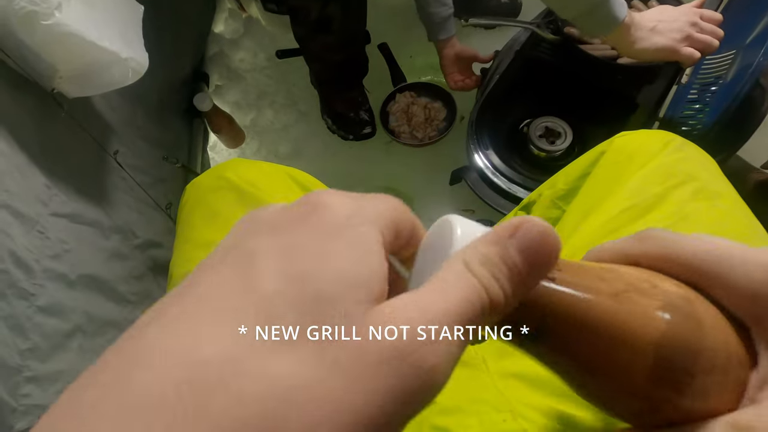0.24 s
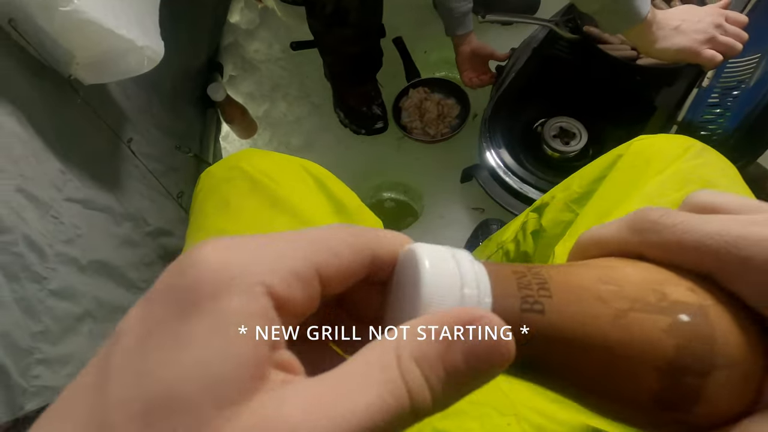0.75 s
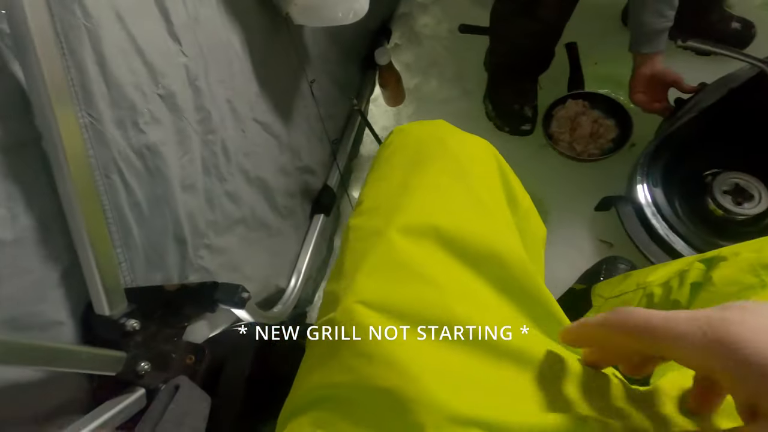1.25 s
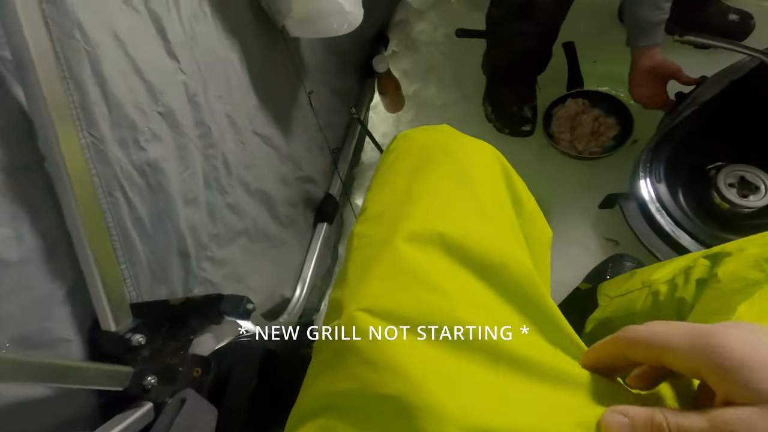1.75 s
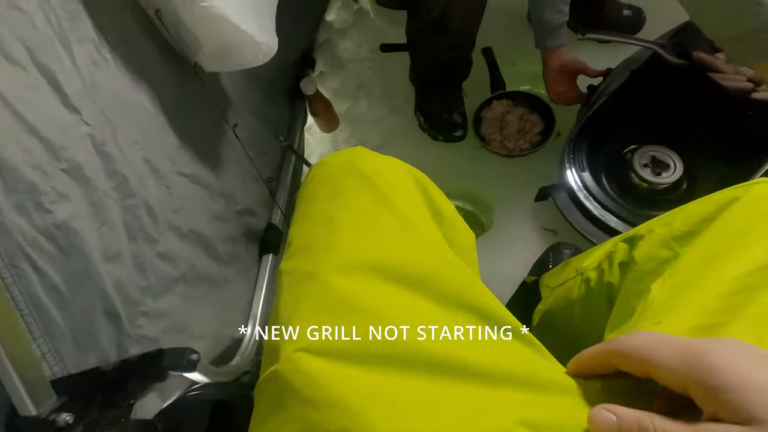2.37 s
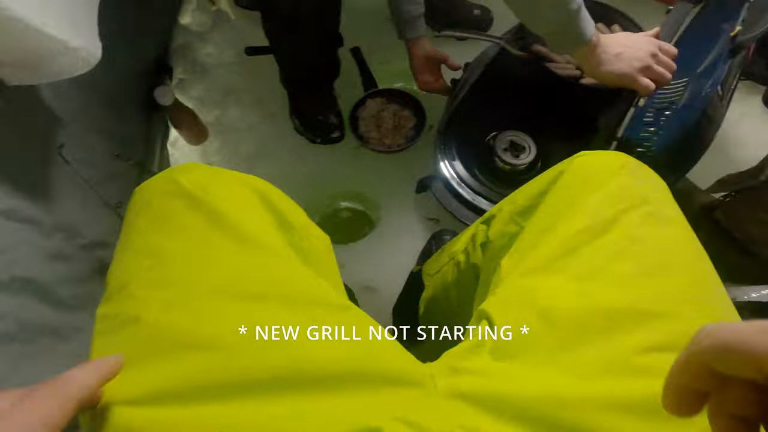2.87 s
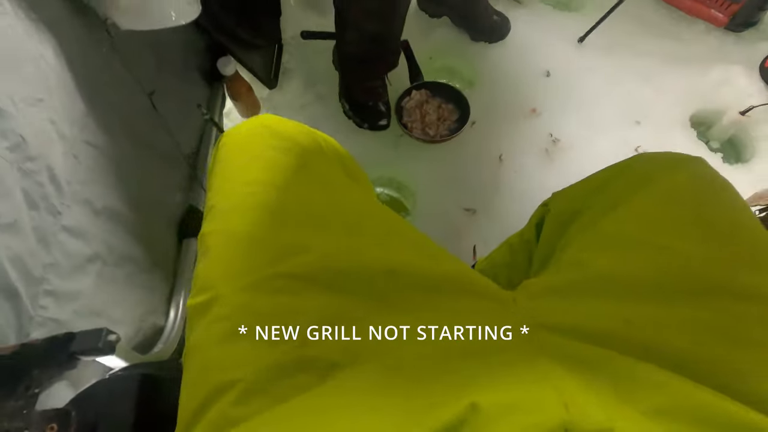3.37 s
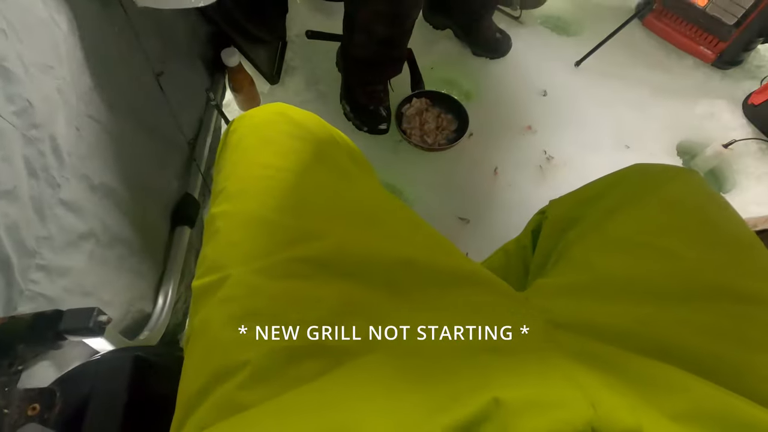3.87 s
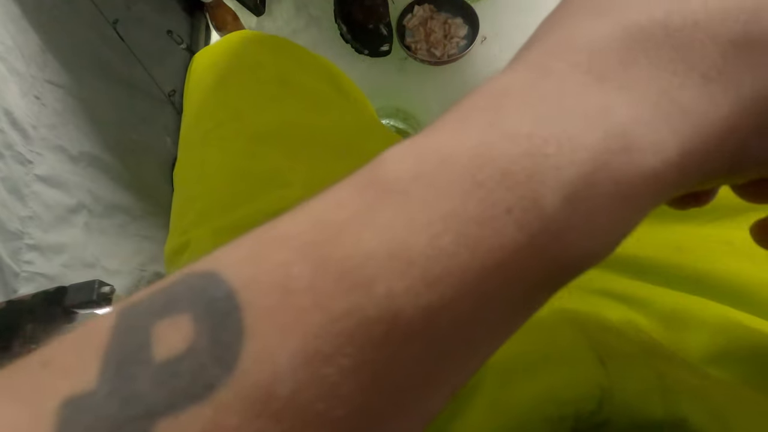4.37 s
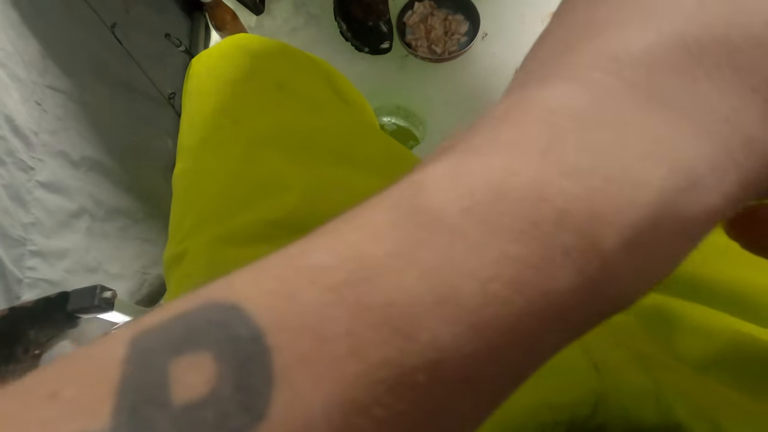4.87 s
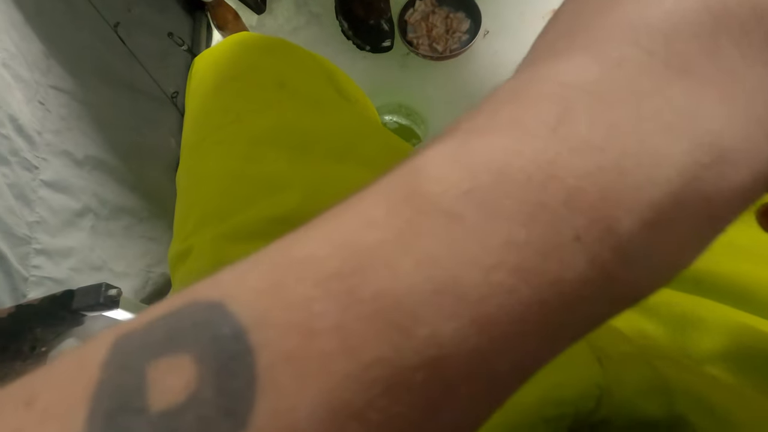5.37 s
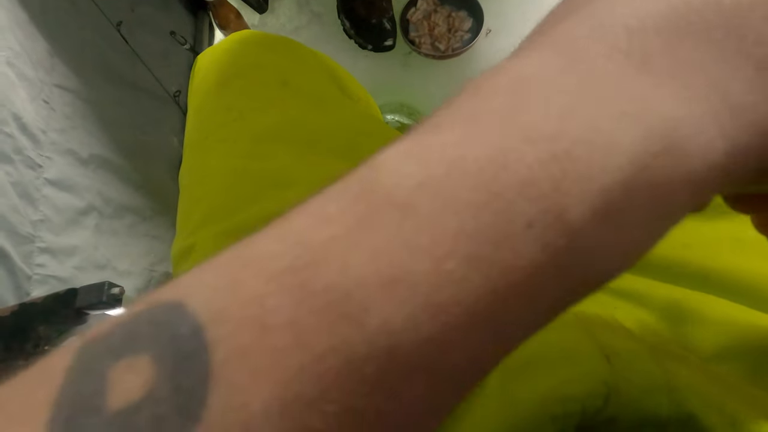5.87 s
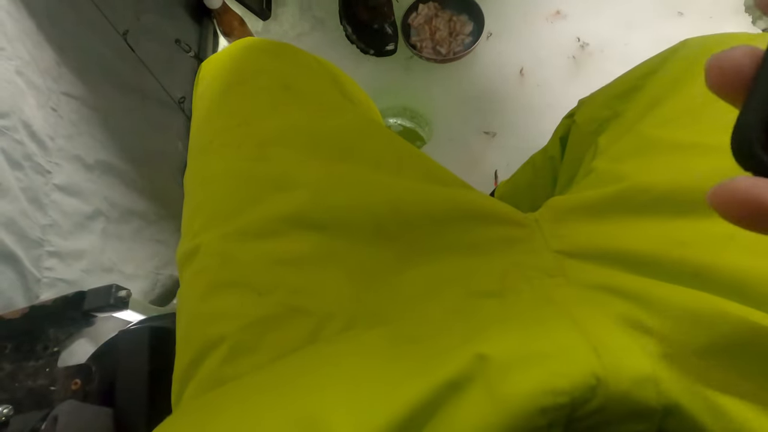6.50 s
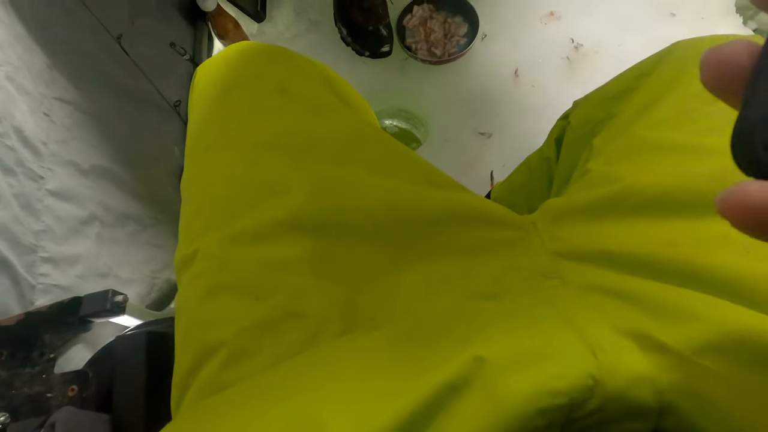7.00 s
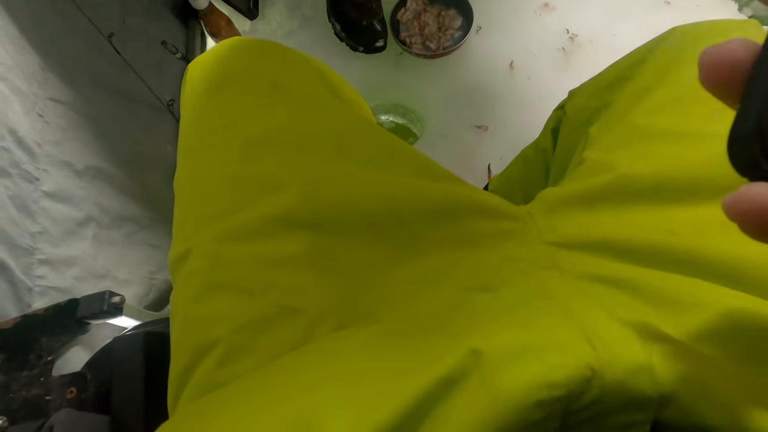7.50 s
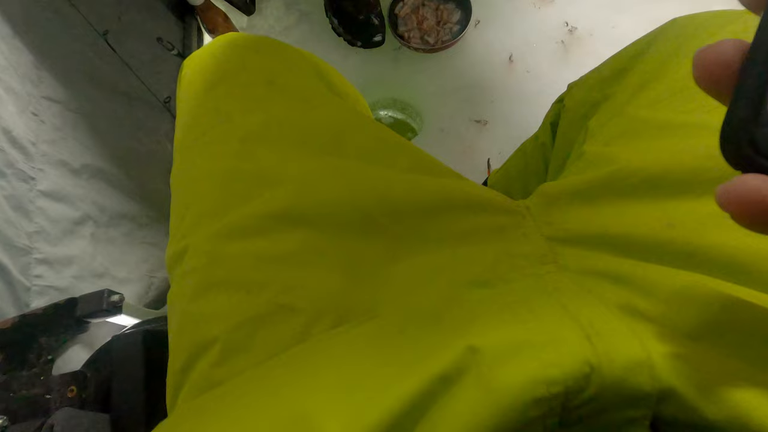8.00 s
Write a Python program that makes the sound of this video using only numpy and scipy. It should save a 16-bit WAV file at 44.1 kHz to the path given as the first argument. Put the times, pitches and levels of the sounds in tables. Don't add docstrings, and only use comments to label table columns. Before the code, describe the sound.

Repeated bright steel snaps from a piezo igniter dominate, close and dry with a short wash off fabric walls. Between them the button ticks back, cloth rustles and boots shuffle, busiest at first. The snapping stops midway while gear thumps and knocks, then returns and quickens, shifted left, with a thin gas whistle and tiny spring squeaks near the end. Worn stereo microphone, low rumble and soft heater hiss throughout.

```python
import sys
import numpy as np
from scipy import signal
from scipy.fft import rfft, irfft
from scipy.io import wavfile
from scipy.ndimage import uniform_filter1d

SR = 44100
rng = np.random.default_rng(int(sys.argv[2]) if len(sys.argv) > 2 else 0)


def amp(db):
    return 10 ** (np.asarray(db, float) / 20)


def write(x):
    x = np.atleast_2d(x).T
    wavfile.write(sys.argv[1], SR, np.round(np.clip(x, -1, 1) * 32767).astype(np.int16))


N = 363516
TIME_S = np.arange(N) / SR
TURN_S = 2.95


def on_log(table, hz):
    table = np.array(table)
    return np.interp(np.log(np.maximum(hz, 1)), np.log(table[:, 0]), table[:, 1])


# pitch_hz, likeness_0_to_1
LIKENESS = [(40, 1), (150, 0.86), (300, 0.96), (600, 0.96), (1000, 0.89), (3000, 0.96), (8000, 0.53)]


def unlike(hz, spread_hz=30000):
    like = np.clip(on_log(LIKENESS, hz), 0, .999) / (1 + (hz / spread_hz) ** 2)
    return np.sqrt((1 - like) / (1 + like)) * np.array([[1], [-1]])


def noise(size, shape):
    hz = np.fft.rfftfreq(size, 1 / SR)
    mid, side = rfft(rng.standard_normal((2, size)))
    x = irfft(shape(hz) * (mid + unlike(hz, spread_hz=4700) * side), size)
    return x / x.std()


def band(lo_hz, hi_hz):
    return lambda hz: 1 / np.sqrt((1 + (lo_hz / (hz + 1)) ** 4) * (1 + (hz / hi_hz) ** 6))


def peak(centre_hz, width_hz):
    return lambda hz: 1 / np.sqrt(1 + ((hz - centre_hz ** 2 / (hz + 1)) / width_hz) ** 2)


def walk(rate_hz):
    hold = int(SR / rate_hz)
    levels = np.repeat(rng.standard_normal(N // hold + 1), hold)
    return 1.22 * uniform_filter1d(levels, hold)[:N]


def decay(t, t60_s):
    return 1000 ** (-t / t60_s)


def add(out, x, start_s, peak_db, pan_db):
    i = max(int(start_s * SR), 0)
    x = x[:, :N - i]
    power = uniform_filter1d(x.mean(axis=0) ** 2, size=180)
    x = x / np.sqrt(2 * np.max(power))
    out[:, i:i + x.shape[1]] += x * amp(peak_db + np.array([[pan_db], [-pan_db]]) / 2)


# pitch_hz, level_db_per_hz
HISS = [(71, -43.5), (120, -25), (280, -13.5), (372, 1), (420, -39), (514, 2.5), (557, -26), (655, -23),
        (852, -24), (1330, -7), (2290, -35), (4840, -15.5), (5920, -31), (8020, -21.5), (15000, -62)]
# pitch_hz, width_hz, level_db
WHISTLES = [(370, 22, -70), (473, 6.7, -71.5), (512, 10, -72.5), (1337, 11, -72), (1550, 20, -78),
            (1710, 5.9, -69.5), (1930, 23, -75.5), (3050, 11, -74.5), (4256, 13, -70.5), (4970, 19, -80),
            (6600, 80, -88)]
# pitch_hz, width_hz, level_db, start_s, end_s
VALVE_WHISTLES = [
    (8000, 80, -79, 4.5, 6.6),
    (6560, 56, -68, 6.8, 11),
]


def heater():
    hiss = noise(N, lambda hz: amp(on_log(HISS, hz)) * (hz > 100) * band(60, 8800)(hz) ** 2)
    out = amp(-62 + 0.39 * walk(3.3)) * hiss
    for hz, width_hz, db in WHISTLES:
        out += amp(db + 1.35 * walk(1.88)) * noise(N, peak(hz, width_hz))
    for hz, width_hz, db, start_s, end_s in VALVE_WHISTLES:
        is_open = abs(TIME_S - (start_s + end_s) / 2) < (end_s - start_s) / 2
        valve = uniform_filter1d(1. * is_open, size=8000)
        out += amp(db) * valve * noise(N, lambda f: peak(hz, width_hz)(f) ** 2)
    return out


# start_s, rumble_db, shuffle_db, cloth_db, crisp_cloth_db
STIR = [(0.0, -58, -38, -67, -71), (0.11, -47, -45.5, -49, -69.5), (0.18, -47, -49.5, -45, -58),
        (0.39, -43.5, -52.5, -51, -70), (0.53, -51.5, -55, -53, -73), (0.71, -48.5, -58, -56.5, -79),
        (0.92, -55, -55, -59, -76), (1.1, -47, -48, -45.5, -60), (1.24, -47.5, -43, -41, -48),
        (1.4, -45.5, -43.5, -48.5, -61), (1.47, -60, -53, -42, -69), (1.51, -48, -48, -51, -75.5),
        (1.58, -53, -51, -50.5, -73), (1.65, -41.5, -59.5, -50, -67), (1.81, -56, -47, -47.5, -68),
        (1.97, -44.5, -44.5, -45, -57), (2.18, -48.5, -57, -46.5, -61), (2.32, -46.5, -46.5, -49.5, -72),
        (2.5, -50, -73, -50.5, -63), (2.54, -45, -59, -47, -64), (2.68, -52.5, -53, -43.5, -64),
        (2.84, -49, -49, -51.5, -90.5), (2.98, -49.5, -56, -52.5, -70), (3.05, -35, -62, -54, -67),
        (3.21, -44.5, -59, -53.5, -66), (3.44, -56, -52, -52, -82), (3.58, -46.5, -60.5, -56, -72),
        (3.83, -52, -39.5, -46.5, -84.5), (3.9, -43.5, -56, -59, -71), (3.99, -57.5, -48, -55, -84),
        (4.08, -47, -67, -56, -83), (4.18, -57, -50, -69, -79), (4.36, -50, -67, -59, -75),
        (4.59, -57, -57, -54, -66), (4.68, -50, -67, -56, -72), (4.84, -51, -58, -48, -83),
        (4.89, -39, -69, -47.5, -81), (5.0, -50.5, -59, -51, -63), (5.07, -42.5, -51, -47, -66),
        (5.21, -50.5, -64, -57, -70), (5.58, -46, -62, -55.5, -73), (5.85, -54, -58, -57.5, -73),
        (6.08, -50, -64, -51, -70), (6.27, -53.5, -56, -55.5, -73), (6.31, -44, -58, -56, -73),
        (6.47, -58.5, -55.5, -56, -79), (6.59, -43.5, -63, -49, -72), (6.65, -56, -58, -53, -64),
        (7.0, -43.5, -53.5, -50, -82.5), (7.04, -53, -56, -59, -88.5), (7.18, -49, -55, -51.5, -62),
        (7.85, -52.5, -65, -51, -79), (8.24, -50, -64, -53.5, -65)]
# pitch_hz, level_db
BOOM = [
    [(100, -27), (215, 4), (350, -4), (520, -1), (900, -6), (1500, -44)],
    [(100, -3), (215, -2), (375, 3.5), (520, -6), (650, -3.5), (1000, -43.5)],
]


def stir():
    start_s, *columns = np.transpose(STIR)
    rumble_db, shuffle_db, cloth_db, crisp_db = (np.interp(TIME_S, start_s, c) for c in columns)
    grain_db = 1.93 * walk(40) + 0.5 * walk(150)
    lean_db = np.array([[.8], [-.8]])
    out = amp(rumble_db + 1.56 * walk(4.9) + lean_db) * noise(N, band(30, 92.8))
    out[0] += amp(2 * rumble_db + 34) * noise(N, lambda hz: peak(52, 45)(hz) ** 2)[0]
    facing, turned = (noise(N, lambda hz: amp(on_log(colour, hz))) for colour in BOOM)
    boots = np.where(np.arange(N) < TURN_S * SR, facing, turned)
    out += amp(shuffle_db - 4.5 + 2 * walk(25)) * boots
    cloth = noise(N, lambda hz: band(1050, 4800)(hz) * band(900, 9000)(hz))
    crisp = noise(N, lambda hz: band(5200, 8500)(hz) * band(900, 12000)(hz))
    out += amp(cloth_db - 4.5 + grain_db) * cloth
    return out + amp(crisp_db - 2.5 + grain_db) * crisp


# pitch_hz, t60_s
STEEL_T60 = [(200, 0.47), (1200, 0.22), (3500, 0.17), (7000, .12), (12000, 0.093)]
# pitch_hz, t60_s, facing_db, turned_db
RINGS = [(1080, 0.14, 3, -32), (1432, 0.47, -8.5, -13), (1670, 0.46, -15.5, -16.5), (2004, 0.55, -11, -9.5),
         (2114, 0.89, -51, -17.5), (2352, 0.47, -13, -8.5), (2800, 0.36, -1, -2), (3054, 0.51, -7, -8.5),
         (4000, 0.49, -10.5, -11), (4220, 0.71, -23, -30), (5230, 0.38, -16.5, -12.5),
         (6520, 0.44, -20, -14.5)]
MODE_COUNT = 1300
BLOW_T = np.arange(12288) / SR


def steel_modes():
    rings = np.repeat(RINGS, 2, axis=0)
    rings[::2, 0] *= 1.005
    hz = np.linspace(150, 16000, MODE_COUNT) + 5 * rng.standard_normal(MODE_COUNT)
    t60_s = np.append(on_log(STEEL_T60, hz), rings[:, 1])
    hz = np.append(hz, rings[:, 0])
    poles = 2j * np.pi * hz - np.log(1000) / t60_s
    return hz, np.exp(np.outer(poles, BLOW_T).astype(np.complex64))


def shack_echoes():
    echoes = noise(len(BLOW_T), np.ones_like) * decay(BLOW_T, .1) * (BLOW_T > .002)
    echoes *= amp(-5.5) / np.sqrt(np.sum(echoes ** 2, axis=1, keepdims=True))
    echoes[:, 0] = 1
    return echoes


# start_s, peak_db, lid_1khz_db, body_3khz_db, bracket_6khz_db, left_minus_right_db
SNAPS = [(0.002, -14, -9.5, -13.5, -6.5, 0.5), (0.517, -14, -9.5, -15, -12, 0),
         (0.943, -14, -15.5, -15, -12, -0.5), (1.378, -15, -18, -18, -16, -1.5),
         (1.792, -15, -3.5, -14, -9, 0), (2.227, -14, -20.5, -13, -13.5, -0.5),
         (2.752, -14, -4, -13.5, -8, 0.0), (3.229, -13.5, -9.5, -15.5, -11, 2),
         (3.753, -13.5, -4.5, -13.5, -8.5, 2), (5.487, -15.5, -10.5, -16.5, -11.5, 2),
         (6.014, -15.5, 0, -11.5, -6.5, 2.5), (6.517, -15.5, -8, -14, -9.5, 1),
         (6.868, -16, -10, -9, -6, 5), (7.203, -15.5, -11, -14, -9.5, 5),
         (7.532, -15.5, -12.5, -12.5, -8, 4.5), (7.891, -16, -17, -13.5, -10.5, 5),
         (8.23, -16.5, -2, -12, -3, 7)]


def snaps(blow):
    out, table = np.zeros((2, N)), np.array(SNAPS)
    usual_db = np.median(table[:, 2:5], axis=0)
    envelope = (1 - np.exp(-BLOW_T / 0.00073)) ** 2 * (1 + 0.67 * np.exp(-BLOW_T / 0.0094))
    for s, db, lid, body, bracket, pan_db in table:
        parts_db = np.array([lid, body, bracket]) - usual_db
        colour = [(600, 0), *zip((1300, 3300, 6200), parts_db)]
        add(out, blow(s, colour, envelope, 1), s - .0004, db + 0.45, pan_db)
    return out


# start_s, peak_db, low_1khz_db, high_6khz_db, t60_s, left_minus_right_db
TICKS = [(0.168, -40, -9, -17, 0.15, -7), (0.182, -35, -9.5, -16.5, 0.45, -4.5),
         (0.2254, -38, -16, -14, 0.064, -5), (0.2752, -41.5, 4, -29, 0.19, -2),
         (0.4229, -36.5, -1.5, -23, 0.4, -1), (0.7545, -43, 3, -25, 0.15, 0.5),
         (0.8783, -36, -0.5, -16, 0.45, 1), (1.1507, -46.5, -1, -22, 0.25, -5),
         (1.2181, -35, -4, -12, 0.45, -3), (1.268, -36, -2, -22, 0.15, -4), (1.3287, -39, 2, -6, 0.16, -3),
         (1.6257, -40.5, 7, -30, 0.31, -5), (2.0185, -37.5, 5.5, -16, 0.41, -3),
         (2.3527, -50, -7, -21, 0.12, -3), (2.4875, -42.5, 5, -24, 0.13, -3),
         (2.9414, -47.5, 2, -35, 0.23, 3), (2.9979, -42, 0, -18, 0.17, -2),
         (3.1336, -52.5, -13, 1, 0.065, 9), (3.3623, -34.5, 3.5, -20, 0.35, 2.5),
         (3.4766, -38.5, -8, -18, 0.45, 2), (3.93, -44, -1, -23, 0.45, 2.0),
         (4.0039, -40.5, -10, -18.5, 0.45, 1), (4.0842, -44, -2, -8, 0.12, 2),
         (4.4998, -41, -5, -4, 0.45, 2), (5.0487, -49.5, -4, -1, 0.15, 6),
         (5.7465, -39.5, -6.5, -23, 0.26, 3), (5.8277, -49.5, -5, -20, 0.17, 1),
         (6.2846, -41.5, 5, -11, 0.27, 3), (6.7495, -47.5, -8, -9, 0.17, 9), (6.793, -47, 0, -30, 0.16, 6),
         (7.0453, -41, -2, -14, 0.22, 5), (7.0683, -43, -9, -16, 0.41, 7.0),
         (7.1037, -39.5, 0.5, -13, 0.42, 4), (7.3997, -39.5, -4, -13.5, 0.17, 6),
         (7.7636, -42.5, -9, -8, 0.22, 7), (8.0935, -40, -2, -8.5, 0.14, 5), (8.152, -49, 0, -9, 0.12, 9)]


def ticks(blow):
    out = np.zeros((2, N))
    for s, db, low_db, high_db, t60_s, pan_db in TICKS:
        damped = (1 - np.exp(-BLOW_T / 0.0026)) ** 2 * decay(BLOW_T, t60_s + 0.013)
        colour = [(1200, low_db + 6), (3000, 0), (6500, high_db + 6)]
        add(out, blow(s, colour, damped, 0.37), s - .002, db + 0.1, pan_db)
    return out


# pitch_hz, level_db
STEEL = [(150, -19), (800, -21), (1000, -11), (2000, -10), (3300, -9), (4600, -7.5), (6600, -10),
         (7200, -13), (10000, -22.5), (14000, -33), (16000, -52)]
# pitch_hz, width_hz, then lift_db in each of four stances
PANELS = [(227, 50, 8.5, 17, 2, 0.5), (347, 84, -15.5, 8.5, 10.5, 10.5), (547, 97, 6, 1, 3.5, 7),
          (753, 470, 1.5, -2, -2.5, -5.5), (1136.5, 160, 12, 9.5, 5, 7), (1270, 90, 1.5, 4, -0.5, 1),
          (1565, 240, -3, -8.5, -8, 1), (1627, 140, -7.5, 4.5, 5.5, 1), (1780, 500, 5, 0, 0.5, 4.5),
          (2330, 97, 6, 2.5, 6.5, 5.5), (2610, 79, 4.5, -10, 0, 1), (3195, 210, 11, 13.5, 10, 12),
          (3530, 143, 2, 11, 7.5, 3), (3840, 150, 4, 1, 10.5, 8.5), (4250, 170, -1, 5, -0.5, 2),
          (5270, 98, 8, 7, -4, 4), (5700, 220, 6, 2, 3.5, 2.5), (6534, 810, 5, 8, 6.5, 10)]
STANCE_S = [2.95, 4.5, 6.7]


def grill():
    hz, modes = steel_modes()
    echoes = shack_echoes()
    rings, panels = np.repeat(RINGS, 2, axis=0), np.array(PANELS)
    offset = (hz[:MODE_COUNT, None] - panels[:, 0]) / panels[:, 1]
    clusters = np.exp(-2 * offset ** 2)

    def blow(s, colour, envelope, reach):
        mid, side = rng.standard_normal((2, len(hz))) + 1j * rng.standard_normal((2, len(hz)))
        mid[:MODE_COUNT] /= np.abs(mid[:MODE_COUNT]) ** .5
        panel_db = clusters @ panels[:, 2 + np.searchsorted(STANCE_S, s)] * reach
        lift_db = np.append(panel_db, rings[:, 2 + int(s > TURN_S)] + 3)
        gain = amp(on_log(STEEL, hz) + lift_db + on_log(colour, hz))
        strength = gain * (mid + unlike(hz) * side)
        struck = (strength.astype(np.complex64) @ modes).real * envelope
        return signal.fftconvolve(struck, echoes, axes=1)[:, :len(BLOW_T)]

    return snaps(blow) + ticks(blow)


# start_s, peak_db, pitch_hz, t60_s,
# bright_edge_db, left_minus_right_db
KNOCKS = [(0.404, -32, 3240, 0.01, -21, -1.0), (1.057, -37.5, 712, 0.14, -4, -1.5),
          (1.074, -26, 730, 0.094, -16, -1), (1.193, -34.5, 710, 0.006, -7, -3),
          (1.254, -28, 870, 0.0053, -1.5, -2.5), (1.528, -33, 1200, 0.008, -21, -6),
          (1.9609, -19, 1270, 0.08, -11, 1.5), (5.3418, -23.5, 1270, 0.095, -30, 4),
          (5.4884, -18.5, 1538, 0.15, -21, 4.5), (6.3275, -35.5, 1637, 0.047, -12, 4),
          (1.959, -33.5, 277.5, 0.38, -28, 1.5), (3.363, -32, 356, 0.13, -26, -2),
          (4.143, -35, 339.5, 0.17, -16, 2), (4.492, -41.5, 342, 0.18, -18, 2),
          (4.884, -32, 379, 0.39, -14, 1.5), (5.139, -33.5, 251, 0.067, -19, 2),
          (5.336, -19.5, 378, 0.16, -12.5, 1), (5.359, -25.5, 340, 0.3, -20, 0.5)]


def knocks(size=16384):
    out, t = np.zeros((2, N)), np.arange(size) / SR
    for s, db, hz, t60_s, edge_db, pan_db in KNOCKS:
        rough = noise(size, lambda f: peak(hz, .5 * hz)(f) ** 2)
        body = np.sin(2 * np.pi * hz * t) + 1.03 * rough
        body *= (1 - np.exp(-t * hz / 0.4)) * decay(t, t60_s + 0.0017)
        edge = noise(size, lambda f: band(500, 3500)(f) * band(300, 9000)(f))
        edge *= (1 - np.exp(-t / 0.00082)) * decay(t, 0.96 * t60_s + 0.007)
        add(out, body + amp(edge_db) * edge, s - .001, db + 0.19, pan_db)
    return out


# start_s, length_s, from_hz, to_hz, peak_db
SQUEAKS = [
    (7.59, .07, 11200, 10900, -76),
    (7.78, .09, 8800, 9500, -78),
    (8.11, .08, 9700, 10500, -70),
]


def spring():
    out = np.zeros((2, N))
    for s, length_s, from_hz, to_hz, db in SQUEAKS:
        hz = np.linspace(from_hz, to_hz, int(length_s * SR))
        waver = 2 * np.pi / 30 * np.cumsum(rng.standard_normal(len(hz)))
        squeak = np.hanning(len(hz)) * np.sin(np.cumsum(2 * np.pi * hz / SR) + waver)
        add(out, squeak * np.ones((2, 1)), s, db, 0)
    return out


def scene():
    return heater() + stir() + grill() + knocks() + spring()


def top_cut(x):
    return signal.sosfilt(signal.butter(12, 15810, fs=SR, output="sos"), x)


# pitch_hz, lag_rad, level_db
PORTS = [(40.2, 0.01, -2), (493, .05, 0), (850, 0.79, 0.5), (1610, 0.23, 1), (2300, 0.92, 1),
         (3400, 0.8, 1.8), (4700, 1.1, 1.3), (7300, 2.07, 1), (8700, 1.9, -2), (13100, 2.5, -3)]


def record(dry):
    hz, ports = np.fft.rfftfreq(N, 1 / SR), np.array(PORTS)
    level_db, lag_rad = on_log(ports[:, ::2], hz), on_log(ports, hz)
    half = amp(level_db / 2) * np.exp(-.5j * lag_rad)
    heard = irfft(rfft(dry) * np.array([half, 1 / half]), N)
    return top_cut(np.tanh(1.306 * heard) / 1.294)


dry = scene()
out = record(dry)
write(out)
```